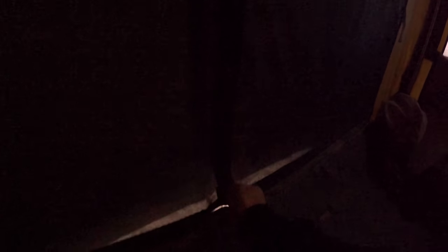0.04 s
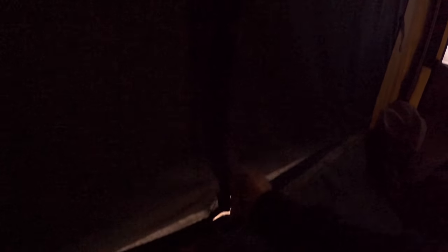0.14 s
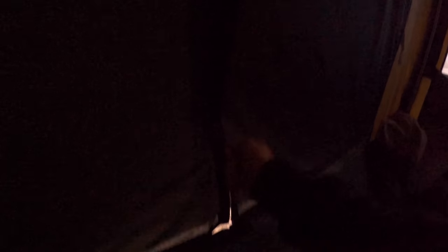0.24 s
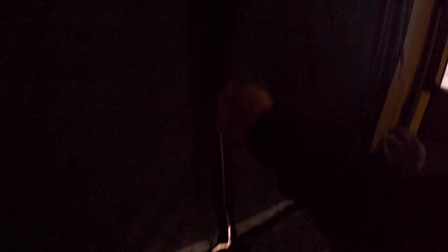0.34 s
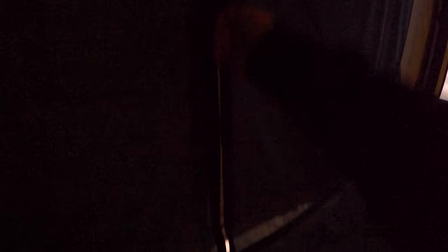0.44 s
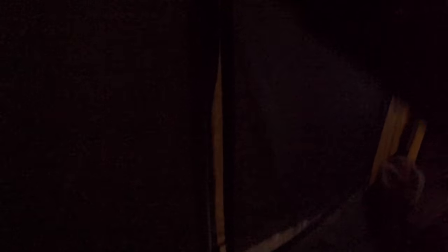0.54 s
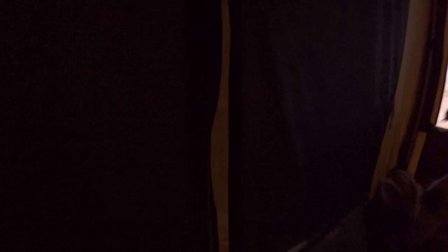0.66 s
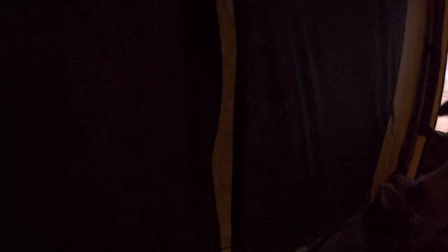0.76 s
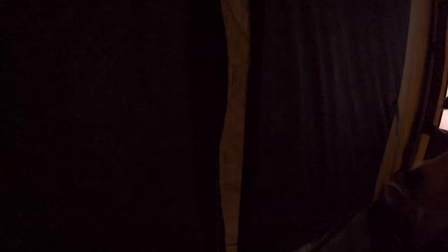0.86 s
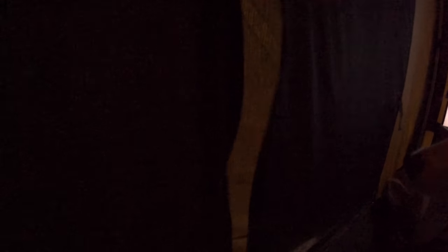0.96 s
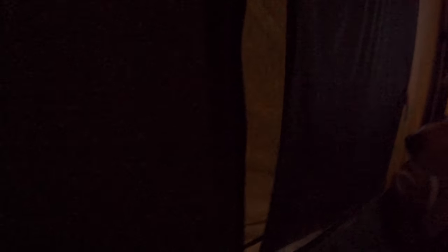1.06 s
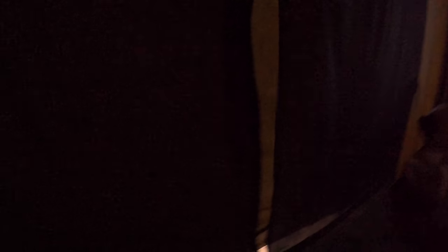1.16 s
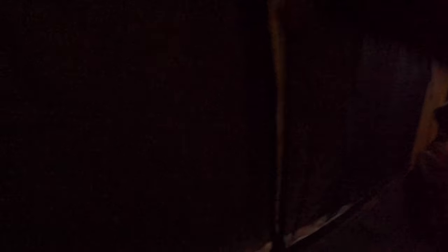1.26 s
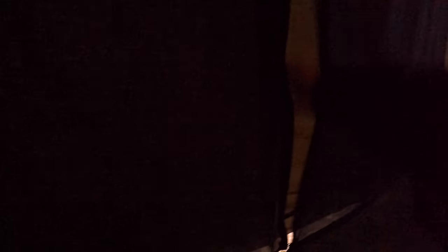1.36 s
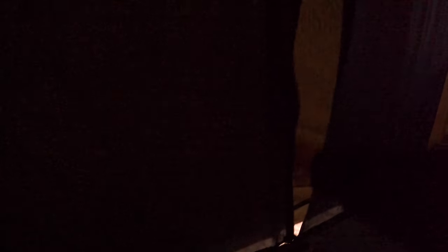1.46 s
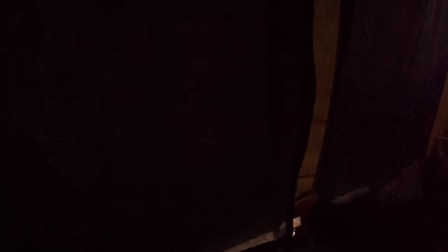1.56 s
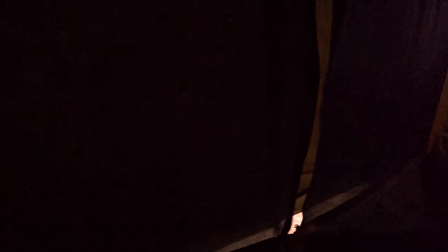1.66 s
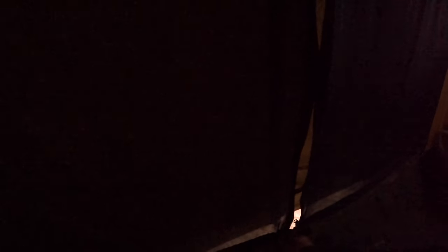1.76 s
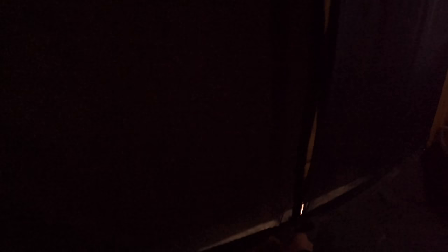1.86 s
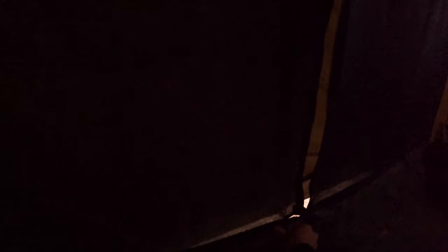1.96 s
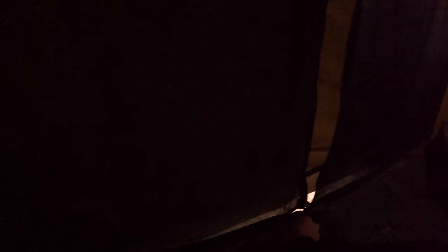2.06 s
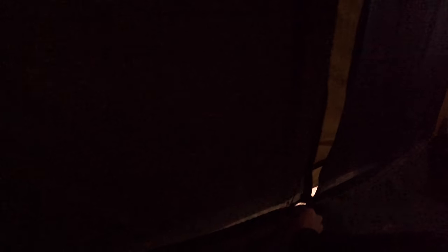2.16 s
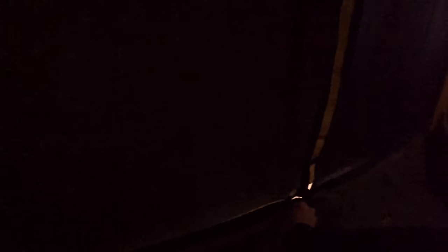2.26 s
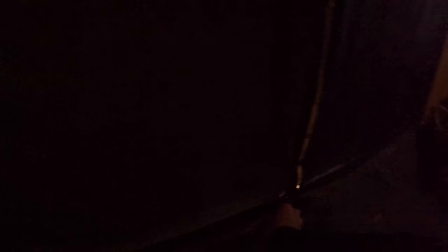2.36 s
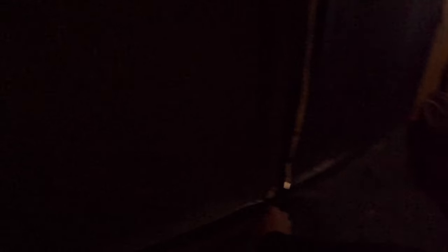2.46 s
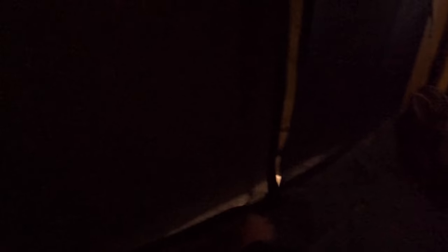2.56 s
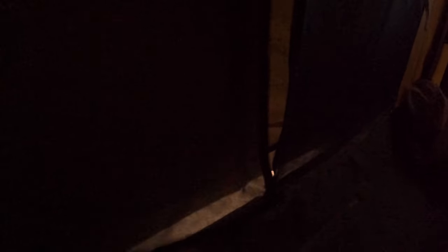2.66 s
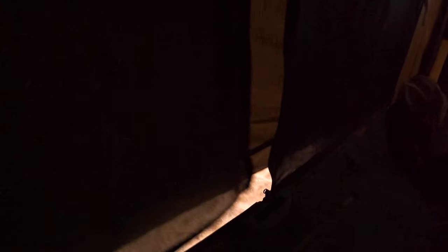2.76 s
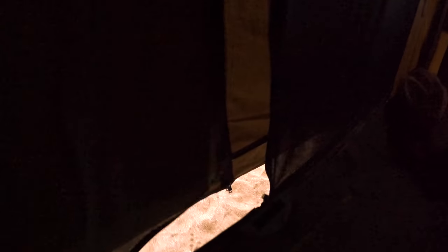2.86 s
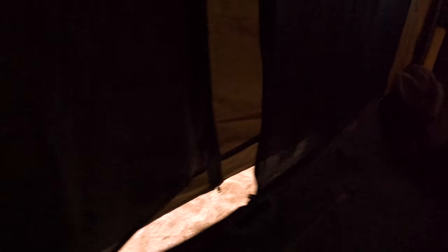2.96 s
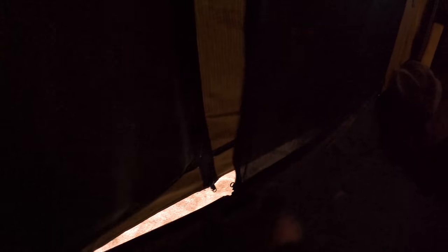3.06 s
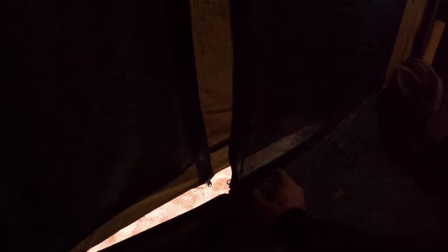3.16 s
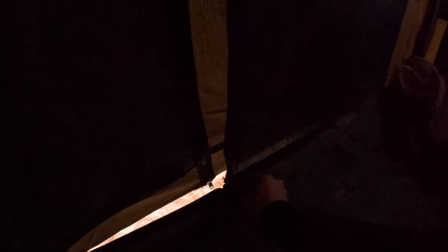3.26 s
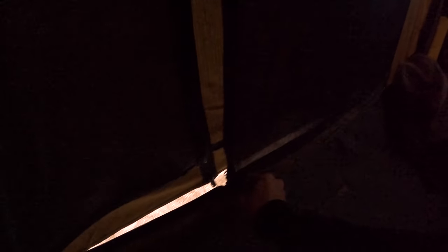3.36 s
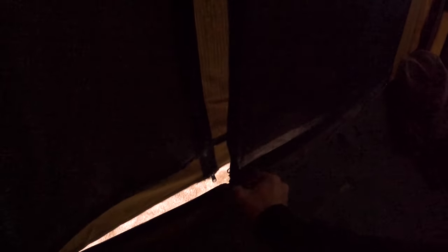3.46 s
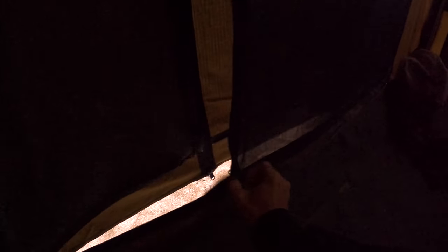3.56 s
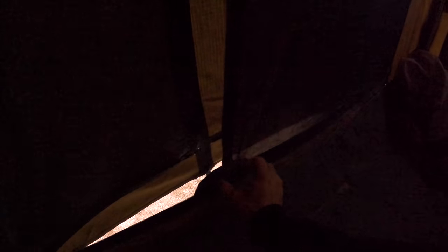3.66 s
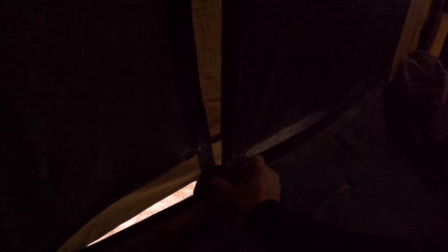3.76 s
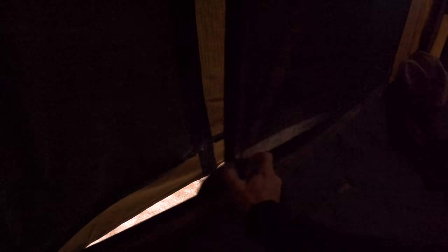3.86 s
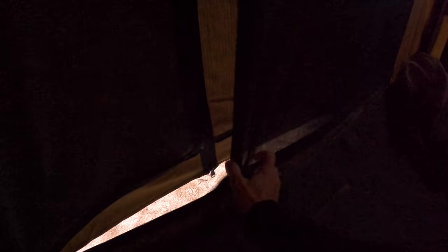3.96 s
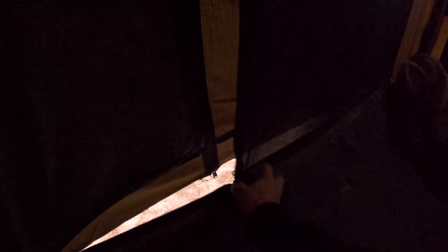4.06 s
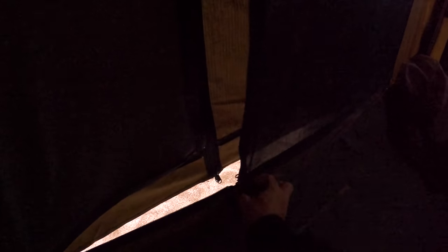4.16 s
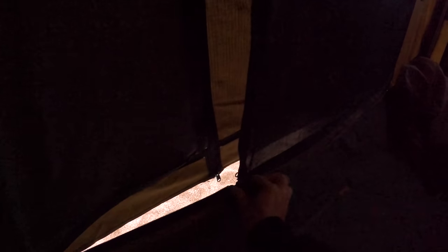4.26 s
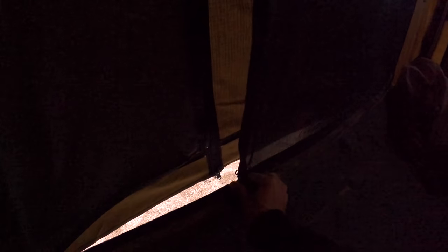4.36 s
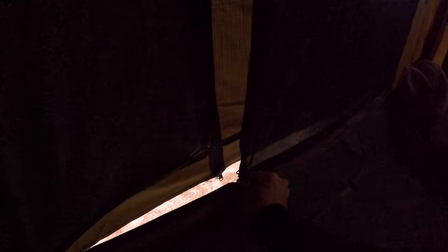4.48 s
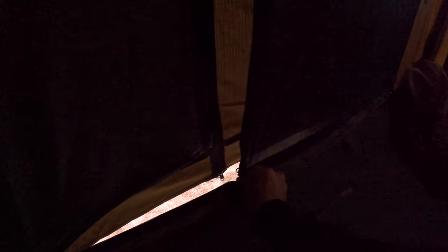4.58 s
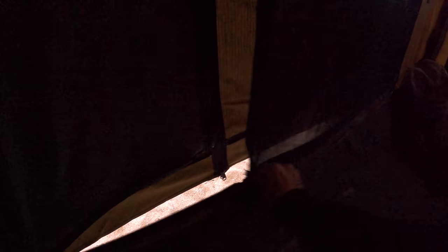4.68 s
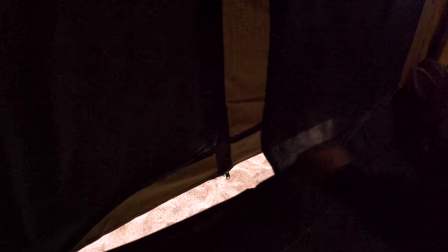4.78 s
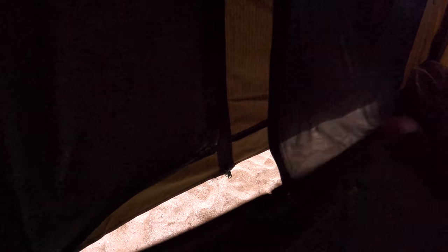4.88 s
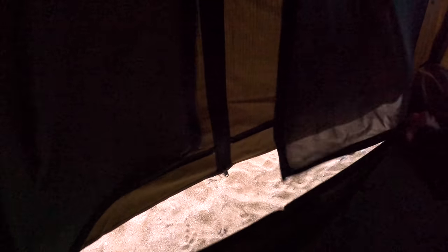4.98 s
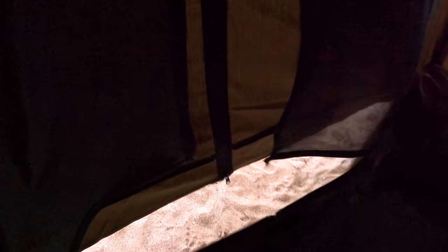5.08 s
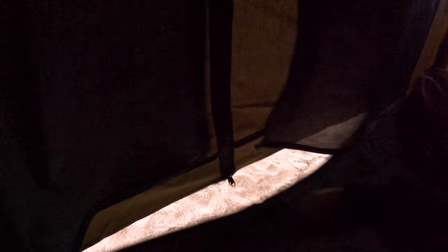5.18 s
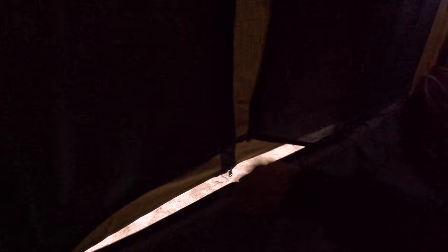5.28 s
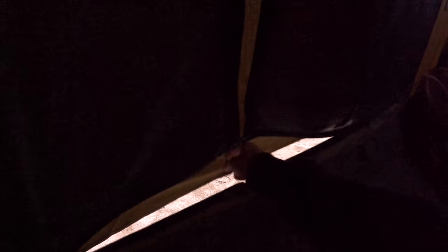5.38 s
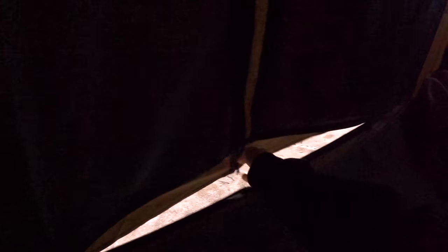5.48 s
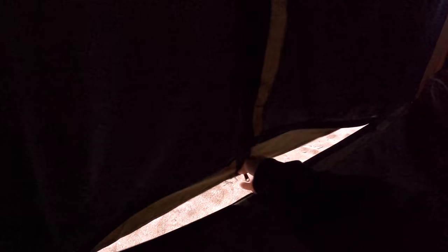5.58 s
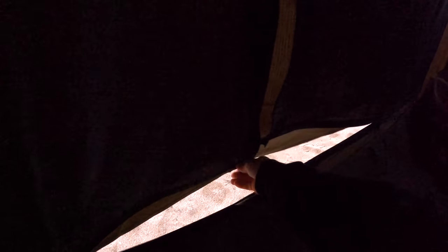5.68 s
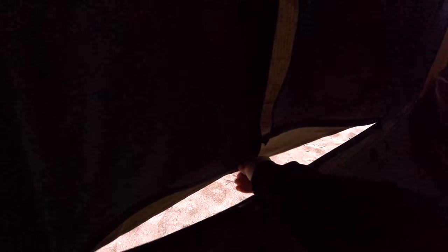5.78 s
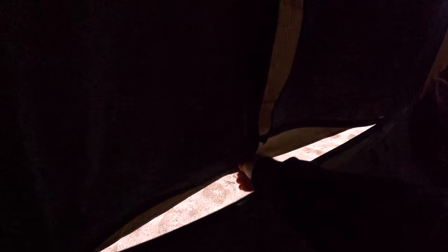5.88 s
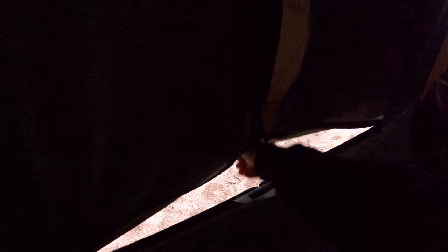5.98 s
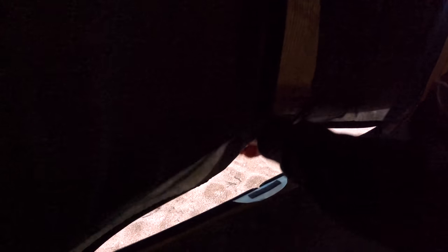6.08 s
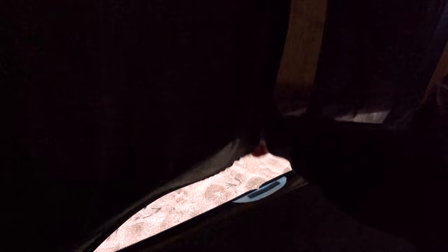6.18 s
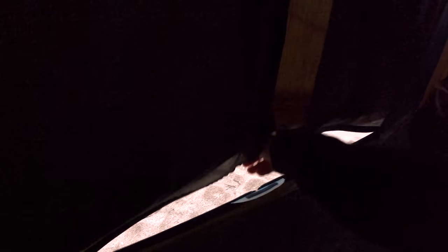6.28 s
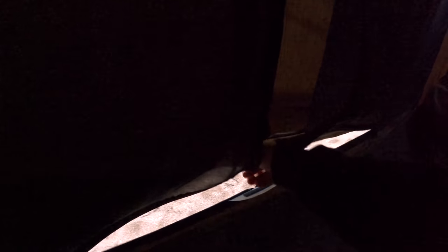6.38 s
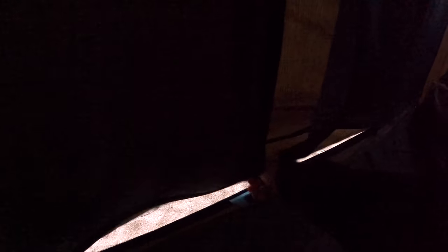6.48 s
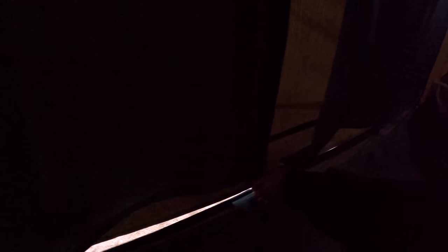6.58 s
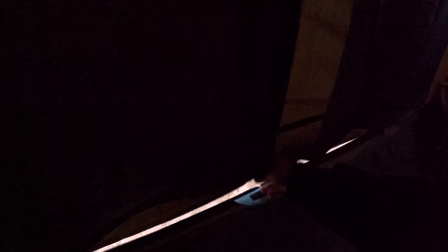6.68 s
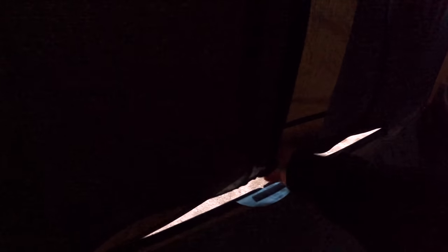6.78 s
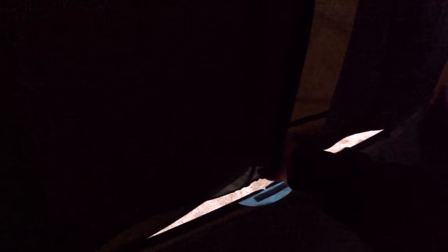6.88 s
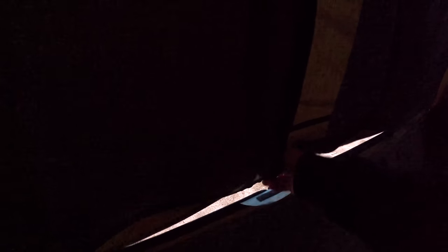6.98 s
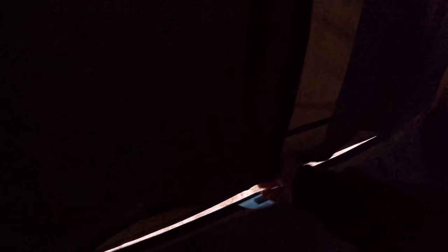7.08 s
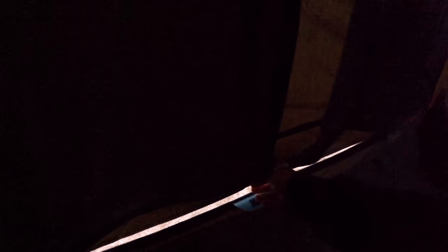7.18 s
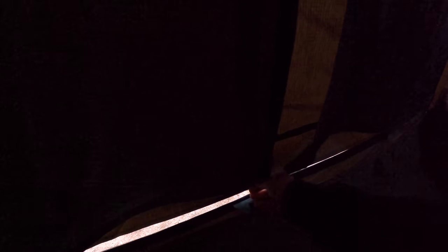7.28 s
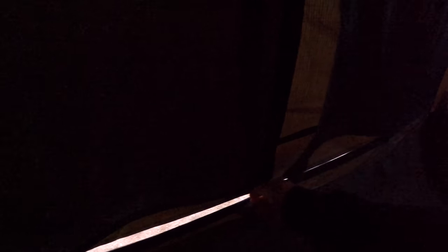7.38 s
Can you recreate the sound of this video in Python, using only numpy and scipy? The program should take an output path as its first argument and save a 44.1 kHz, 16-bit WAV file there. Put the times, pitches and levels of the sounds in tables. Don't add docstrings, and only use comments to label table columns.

```python
import sys
import numpy as np
from scipy import signal
from scipy.fft import rfft, irfft, next_fast_len
from scipy.io import wavfile
from scipy.ndimage import uniform_filter1d

SR = 44100
rng = np.random.default_rng(int(sys.argv[2]) if len(sys.argv) > 2 else 0)


def magnitude_from_level(level_db):
    exponent = np.asarray(level_db, float) / 20
    return 10 ** exponent


def wav_record(signal):
    frames = np.transpose(np.atleast_2d(signal))
    bounded = np.clip(frames, -1, 1)
    quanta = np.round(bounded * 32767).astype(np.int16)
    wavfile.write(sys.argv[1], SR, quanta)


N = 328041
TIME = np.arange(N) / SR
SIZE = next_fast_len(N)
HZ = np.maximum(np.fft.rfftfreq(SIZE, 1 / SR), 10)

# [start_s, teeth_hz (teeth per second), rasp_db, singing_db, edge_db]
SET_OFF = [
    (0.23, 260, -46, -58, -13),
    (0.28, 382.7, -39.5, -48, -11.5),
    (0.315, 458, -39, -41, -11),
    (0.336, 579, -37, -41, -14.5),
    (0.382, 790, -33, -40.5, -18),
    (0.4, 844, -30.5, -40, -15.5),
    (0.428, 864, -29.5, -37, -16),
    (0.445, 965, -31, -38.5, -15.5),
    (0.49, 1005, -32, -37.5, -15.5),
]
RUN = [
    (0.511, 1060, -33.5, -35, -13),
    (0.56, 1030, -31.5, -35, -17),
    (0.632, 1070, -32, -36, -15.5),
    (0.69, 1040, -33.5, -36, -14),
    (0.73, 985, -34, -38.5, -11.5),
    (0.81, 1080, -30, -43, -13),
    (0.86, 1063, -33.5, -35, -8.5),
]
STOP = [
    (0.92, 1096, -38.5, -34.5, -3),
    (0.958, 1049, -41, -29.5, 1),
    (0.976, 957, -37, -36, -4.5),
    (0.992, 772, -34.5, -40.5, -7),
    (1.01, 552, -36.5, -40.5, -8),
    (1.068, 203, -49, -60, 5),
]
SECOND_STROKE = [
    (2.67, 508, -46, -70, -25),
    (2.725, 737.5, -32, -54, -12),
    (2.755, 937, -30.5, -37.5, -4),
    (2.785, 1037, -34, -35, -10.5),
    (2.82, 1208, -38, -31, -5),
    (2.858, 1250, -40, -29.5, -12.5),
    (2.882, 1090, -32, -33, -6),
    (2.9, 897.4, -31, -30, -7),
    (2.925, 686, -32, -53.5, -14),
    (2.97, 438, -58, -67, -16),
]
THIRD_STROKE = [
    (4.85, 416.4, -50, -62, -17),
    (4.9, 631, -33.5, -45, -9),
    (4.938, 931, -31, -36, -15),
    (4.969, 1301, -29, -40.5, -10.5),
    (4.987, 1221, -31, -31.5, -9.5),
    (5.02, 1363, -31, -29, -5),
    (5.045, 1290, -32, -34.5, -11.5),
    (5.065, 992, -28, -29, -2),
    (5.085, 798, -25.5, -42, -12),
    (5.151, 197.5, -46, -67, -15),
]
# [time_s, share of speed, length_s]
LURCHES = [(0.61, -.02, .01), (0.632, .015, .008), (0.702, .025, .007), (0.72, -.025, .01),
           (0.745, .035, .014), (0.786, -.055, .01), (0.812, .07, .013), (0.835, -.055, .008),
           (0.886, -.03, .008), (2.868, .03, .008), (4.972, .03, .008)]
# [time_s, level_db, length_s]
STUMBLES = [(0.397, -4, 0.004), (0.463, -7.5, 0.016), (0.661, -14.5, 0.015), (0.74, -10.5, 0.0067),
            (0.785, -11.5, 0.0074), (0.815, -6, 0.03), (0.775, -8, .004), (4.88, -14, .022),
            (0.876, -8, 0.0053), (0.885, -8, 0.015), (2.835, -3, 0.006), (0.835, -13, 0.0088),
            (0.925, -5, .005), (4.952, -5.5, .005), (2.905, -8, .015), (5.01, -12.5, 0.013),
            (5.09, -6, 0.014)]
# [time_s, level_db, length_s]
FALTERS = [(0.704, -7, 0.018), (0.765, -3, 0.042), (2.775, -20, 0.0094), (2.865, -13, 0.018),
           (2.914, -7, 0.0084), (4.912, -20, 0.012), (4.967, -14, .016), (5.006, -16, 0.007),
           (4.993, 4, .007), (5.082, -10, .008), (0.457, -9, .006), (0.75, -16, 0.01), (0.887, -8, 0.0057)]
PATH_GAPS = {3: [(0.35, 5, .02), (0.515, -5, 0.01), (0.59, 1, .008), (0.66, -7, .015), (0.8, -17, 0.086),
             (0.93, 0, 0.019), (1.0, -13, 0.024), (2.772, -5, 0.006), (2.81, -3, 0.016), (2.89, -4, 0.0079),
             (4.945, -7, .018), (5.047, 8, .006), (5.065, -18, 0.013)], 4: [(0.35, -12, .01),
             (0.41, 10, 0.027), (0.5, -14, 0.055), (0.69, 2, .06), (0.64, 3, .03), (0.81, 5, .012),
             (0.84, -3, .01), (0.878, 5, .012), (0.94, -5, 0.032), (1.0, -12, .02), (2.78, 4, .02),
             (2.822, -7, 0.013), (2.86, 5.5, 0.015), (2.9, -9, 0.015), (4.945, -4, 0.0073),
             (5.065, -2.5, 0.024)], 5: [(0.62, -10, 0.033), (0.78, -6, 0.042), (0.92, 6, 0.033),
             (2.77, 1, .02), (2.85, 2, .025), (5.0, -8, .02), (5.035, 7.5, .015), (4.94, -6, .01),
             (4.965, 3, 0.011), (5.065, 0, .012)], 6: [(0.845, 9, .012), (0.93, 2, .02), (4.955, -3, .01),
             (5.02, 1, 0.019)], 7: [(4.96, 3, .01), (5.03, 8, .015)], 8: [(4.985, -6, .01),
             (5.03, 2, .015)], 9: [(5.02, 8, .02), (2.84, 3, 0.021)]}
COIL_PARTIALS = [
    (0, 0.4, -6, -9.5, -11),
    (0, -4, -3, -1.5, -7.5),
    (0, 0.5, -2.5, -2.5, -12),
]
# [frequency_hz, level_db]
WALL_RADIATION = [(300, -11), (700, 1.5), (950, 2), (1300, 3.5), (2050, 3.5), (3000, 2.5), (4000, 2.5),
                  (5500, 1)]
ROLL_DB = (-3.5, -4, -3.5)
FLOOR_ROLL_DB = (-1.5, -1.5, -1)
BLUR_RAD = (.11, .08, .065)
# [frequency_hz, level_db]
RASP_COLOUR = [(400, -72), (900, 1), (1500, 0), (2200, 3), (3500, 0.5), (6000, -3.5), (8000, -14.5),
               (10800, -25), (11600, -27.5), (15500, -45)]
LONG_COIL = [(3500, -1.5), (4400, 0.5), (6500, 0.5), (7900, -1.5), (10300, 2), (10900, -3), (11500, -3),
             (14000, 2)]
# [time_s, level_db, length_s]
GLINTS = [
    (0.639, 0.5, .03),
    (0.8, -6, 0.022),
    (2.84, 0, .03),
    (2.93, 2, .02),
    (4.89, -5, .03),
    (5.002, 8.5, .025),
    (5.07, 1.5, .03),
    (5.113, 2, .02),
]
SHELF_DB = (-2, 0.5, -2)

# [frequency_hz, level_db, t60_s]
TAB_MODES = [
    (6240, -0.5, 0.071),
    (9980, 2.5, 0.082),
    (11800, 0, .06),
    (14800, 8, 0.13),
]
# [start_s, peak_db, hardness_db of the two top modes]
TINKLES = [(0.1057, -40, -36), (0.119, -47, -31), (0.189, -43, -17.5), (0.247, -27, -36),
           (0.2713, -32, -34), (0.31, -43, -26), (1.0841, -46, -38), (1.1327, -43, -30), (1.1594, -46, -24),
           (1.4683, -36, -24), (1.8194, -63, -8), (1.886, -68, -4), (1.9296, -62, -12), (3.2166, -41, -36),
           (3.2949, -38.5, -33), (3.4082, -46, -30), (3.493, -34, -26), (3.76, -39, -39),
           (4.2712, -40.5, -28), (4.367, -40, -39), (5.2, -44, -24), (5.439, -39, -37), (5.5994, -56, 0.5),
           (5.6336, -50, -22), (5.7683, -48, -42), (6.4832, -47, -30), (6.6034, -56, -28),
           (6.698, -31, -42)]
# [start_s, peak_db]
TWISTS = [
    (0.0175, -53),
    (0.188, -60),
    (0.3094, -58),
    (3.2949, -55),
    (3.4082, -49),
    (4.2712, -58),
    (5.1995, -45),
    (5.439, -49),
    (5.6025, -62),
]
# [time_s, rms_db, centre_hz, width_hz, length_s]
SQUEAKS = [(3.306, -45.5, 3160, 400, 0.016), (3.347, -45, 4200, 400, 0.026), (3.364, -41, 2150, 400, 0.013),
           (3.379, -37, 1890, 400, 0.015), (3.768, -47.5, 2980, 400, 0.018), (4.006, -50, 4830, 500, 0.032),
           (5.353, -43, 7950, 894, 0.0094), (6.151, -50, 4000, 500, 0.027), (0.99, -34.5, 5500, 1504, 0.07),
           (1.395, -62, 11500, 3000, 0.04), (4.003, -62, 10170, 5990, 0.043),
           (5.337, -62, 8920, 8000, 0.028)]
# [start_s, peak_db, centre_hz]
CRACKS = [(1.0363, -28, 5000), (1.0471, -30, 4000), (1.2693, -33, 1200), (4.1911, -30, 2500),
          (4.8891, -28, 2520), (5.0872, -18, 2500), (5.1004, -27, 2524), (5.1042, -30, 2000),
          (5.1084, -28, 2000), (5.1131, -26, 2500), (5.126, -18.5, 2200), (5.1261, -18, 2200),
          (5.1955, -24.5, 1795), (5.2502, -36, 2000), (5.5574, -28, 2200), (5.561, -24, 1500),
          (5.5603, -27, 1800), (5.5714, -26, 3000), (5.58, -21, 2300), (5.5865, -30, 3500),
          (5.6036, -23, 4200), (5.6255, -32, 4000), (5.6407, -36, 3000)]
# [start_s, peak_db, centre_hz]
THUDS = [
    (1.218, -23, 190),
    (1.227, -24, 200),
    (1.2425, -24, 180),
    (1.4385, -19, 230),
    (1.657, -26, 230),
    (3.965, -23.5, 150),
    (6.205, -27, 170.3),
]
# [start_s, peak_db, top_db of the click]
CLOTH_TICKS = [(0.0176, -42.5, -1), (1.126, -54, -10), (1.049, -45, -20), (1.4676, -52, -5),
               (1.725, -37, -31), (1.885, -50, -4), (1.27, -47, -10), (1.927, -40, -33), (2.4696, -38, -26),
               (3.2594, -46.5, -18), (3.297, -31.5, -28), (3.426, -37, -29), (3.598, -37, -33),
               (3.633, -35, -34), (3.6421, -32, -27), (3.7439, -36, -34), (3.8583, -44, -9),
               (4.1905, -27, -39), (4.2712, -46, -24), (4.561, -41, -34), (5.2859, -41, -28),
               (5.5615, -35, -38), (5.584, -39, -32), (5.6404, -41, -28), (5.91, -49, -30),
               (6.486, -37, -22), (6.995, -39, -18)]
# [start_s, peak_db]
THIN_TICKS = [
    (3.3353, -36),
    (5.6026, -31),
    (5.623, -35),
    (5.8681, -52),
]
# [start_s, peak_db]
TAB_TICKS = [
    (0.1194, -41),
    (0.189, -40),
    (0.243, -42),
    (3.2171, -44),
    (3.4915, -45),
    (5.199, -34),
]
# [start_s, peak_db, centre_hz]
SNAPS = [(1.27, -34, 700), (1.433, -47, 970), (5.127, -28, 2450), (5.1262, -23, 1170), (5.196, -30, 1700),
         (5.195, -36, 960), (5.249, -35, 943), (5.25, -35, 2200), (5.551, -29, 1500), (5.5552, -28, 2550),
         (5.559, -29, 1250), (5.5672, -28, 2590), (5.576, -31, 2480)]
# [start_s, peak_db]
SLAPS = [
    (1.218, -26),
    (1.238, -31),
    (1.251, -25),
    (1.431, -21.5),
    (1.653, -31),
    (3.96, -32),
    (4.884, -27),
    (5.084, -25),
    (5.098, -24),
    (6.202, -22),
]
# [start_s, peak_db, centre_hz]
BUMPS = [(0.048, -47, 53.4), (0.096, -28, 70.0), (0.239, -23.5, 69.4), (0.897, -28.5, 30.2),
         (1.024, -30, 43.3), (1.224, -32, 53.8), (1.251, -25.5, 58.5), (1.431, -28, 59.5), (1.62, -18, 43),
         (1.649, -35, 43.1), (1.829, -40, 48.4), (2.328, -28, 74.1), (2.848, -37, 70), (2.969, -33, 32.6),
         (3.718, -37, 24.1), (3.956, -23.5, 45.8), (4.03, -24, 69.6), (4.097, -27, 30.2),
         (4.149, -37, 24.3), (4.889, -26, 69.4), (5.029, -32, 31.9), (5.1, -26, 71.6), (5.15, -27, 51),
         (5.349, -32.5, 39.6), (5.444, -24, 75), (6.2, -37, 51.1), (6.745, -43, 43), (7.088, -30, 56.5),
         (7.329, -30, 32.7)]
# [time_s, level_db, length_s, top_db]
RUBS = [(0.24, -51.5, 0.075, -17), (1.1, -57, 0.62, -15), (1.593, -62.5, 0.97, -26),
        (2.477, -52.5, 0.021, -19), (3.35, -57, 0.11, -15), (4.134, -62.5, 0.31, -15),
        (4.87, -59, 0.065, -22), (5.143, -54, 0.096, -13), (5.275, -59.5, 0.19, -17),
        (5.596, -51, 0.038, -21), (6.182, -57.5, 0.046, -18), (7.0, -68, 0.74, -55)]
# [frequency_hz, level_db]
CLOTH_COLOUR = [(900, 3.5), (2000, 4), (4000, -2.5), (7000, -5.5), (10000, -19), (12500, -30), (13500, -28),
                (15500, -57)]
# [frequency_hz, level_db]
RUMBLE_COLOUR = [(12, -52), (20, -8.5), (70, -5.5), (109, -1), (191, -3), (256, -6), (352, -13),
                 (547, -16.5), (618, -22), (1090, -23), (2690, -28.5), (7000, -44), (9100, -43),
                 (15400, -120)]
# [frequency_hz, level_db]
RUMBLE_TREBLE = [(6500, -1), (8000, -11), (9000, -25), (12000, -24), (13000, -30), (13600, -58)]
# [time_s, level_db]
SWELL = [
    (0.0, -28.5),
    (0.12, -32),
    (0.29, -37.5),
    (3.29, -35.5),
    (3.94, -33.5),
    (5.2, -39),
    (6.15, -34),
    (7.0, -36.5),
    (7.21, -33.5),
    (7.44, -37),
]
# [frequency_hz, likeness_0_to_1]
FAR_LIKENESS = [(25, 0.84), (120, 1), (300, 1), (700, 0.86), (1500, 0.71), (3000, 0.68), (7000, 0.48),
                (15000, 0)]
NEAR_LIKENESS = [(500, 0.99), (1500, 0.93), (3000, 0.67), (7000, 0.81), (15000, 0)]
# [frequency_hz, left_minus_right_db]
SHADOW = [(60, 0), (1500, -.7), (3000, -1.5), (5000, -4.5), (9000, -6.5), (15000, -7)]


def rms_one(x):
    return x / np.sqrt(np.mean(x ** 2) + 1e-20)


def at_hz(points):
    hz, values = np.transpose(points)
    return np.interp(np.log(HZ), np.log(hz), values)


def played(tables, fade_s):
    s, *columns = np.transpose(np.concatenate(tables))
    gate = 0
    for table in tables:
        inside_s = np.minimum(TIME - table[0][0], table[-1][0] - TIME)
        gate = gate + np.clip(inside_s / fade_s, 0, 1)
    return gate, [np.interp(TIME, s, column) for column in columns]


def bell(s, length):
    return np.exp(-((TIME - s) / length) ** 2)


def swells(rows):
    return sum(height * bell(s, length) for s, height, length in rows)


def drift(rate):
    r = np.exp(-16 * np.pi * rate / SR)
    noise = rng.standard_normal(N // 8 + 5002)
    slow = signal.lfilter([1], [1, -2 * r, r * r], noise)[5000:]
    return np.interp(np.arange(N) / 8, np.arange(len(slow)), rms_one(slow))


def filtered(x, order, hz, kind):
    return signal.sosfilt(signal.butter(order, hz, kind, fs=SR, output="sos"), x)


def split(x, top_db, hz):
    return filtered(x, 3, hz, "low") + filtered(x, 3, hz, "high") * magnitude_from_level(top_db)


def add(out, s, sound):
    i = max(round(s * SR), 0)
    out[..., i:i + sound.shape[-1]] += sound[..., :N - i]


def ports(same, other, likeness, lag_us, shade, colour_db=0):
    alike = np.clip(at_hz(likeness), 0, 1)
    mid = np.sqrt(1 + alike) * rfft(same, SIZE)
    side = np.sqrt(1 - alike) * rfft(other, SIZE)
    tilt = magnitude_from_level(shade * at_hz(SHADOW) / 2) * np.exp(-1j * np.pi * HZ * lag_us * 1e-6)
    pair = np.array([(mid + side) * tilt, (mid - side) / tilt]) * magnitude_from_level(colour_db)
    return irfft(pair / np.sqrt(2), SIZE)[:, :N]


def zipper():
    strokes = [SET_OFF + RUN + STOP, SECOND_STROKE, THIRD_STROKE]
    gate, (teeth_hz, rasp_db, singing_db, top_db) = played(strokes, fade_s=0.022)
    stroke = np.searchsorted([STOP[-1][0], SECOND_STROKE[-1][0]], TIME)
    teeth_hz = teeth_hz * (1 + swells(LURCHES))
    stumble_db = swells(STUMBLES)
    edge_db = top_db + 8.5
    unsteady = 0.00846 * (1 - .06 * stumble_db) * np.minimum(1250 / teeth_hz, 1.8) ** 1.5
    wavering = drift(90) + .8 * drift(22)
    turn = 2 * np.pi * np.cumsum(teeth_hz * (1 + unsteady * wavering)) / SR
    tone = singing(stroke, teeth_hz, turn, rasp_db, singing_db, stumble_db, edge_db)
    hiss = rasp(stroke, teeth_hz, turn, edge_db)
    return gate * (tone + hiss * magnitude_from_level(rasp_db - 2.0))


def singing(stroke, teeth_hz, turn, rasp_db, singing_db, stumble_db, edge_db):
    falter_db = swells(FALTERS)
    sheet_hz, sheet_db = np.transpose(WALL_RADIATION)
    orders_db = list(np.transpose(COIL_PARTIALS)[:, stroke])
    fifth_db = orders_db[-1]
    orders_db += [fifth_db + np.take(ROLL_DB, stroke) * k for k in range(1, 7)]
    tone = np.zeros((2, N))
    for k, order_db in enumerate(orders_db, 1):
        upper = k > 2
        per_edge = {1: 0, 2: -1.46}.get(k, 0.095)
        db = order_db + singing_db + per_edge * edge_db
        db = db + stumble_db * (1 if k == 2 else 0.38) + falter_db * (k == 1)
        db = db + upper * -4 * np.log2(teeth_hz / 1150)
        db = db + np.interp(np.log(k * teeth_hz), np.log(sheet_hz), sheet_db)
        db = db + swells(PATH_GAPS.get(k, []))
        least_db = rasp_db - 20 + np.take(FLOOR_ROLL_DB, stroke) * max(k - 5, 0)
        least = upper * magnitude_from_level(least_db) * (teeth_hz / 1250) ** 2
        height = np.sqrt(2) * np.hypot(magnitude_from_level(db), least)
        flutter_db = .6 + .7 * (min(k, 4) if upper else 1)
        chatter_db = 2.3 if upper else 1
        height = height * magnitude_from_level(flutter_db * drift(25))
        height = height * (1 + .26 * drift(300)) * magnitude_from_level(chatter_db * drift(70))
        phase = k * turn + .9 * k * k + np.take(BLUR_RAD, stroke) * k ** 1.5 * drift(110)
        tone[0] += height * np.cos(phase)
        tone[1] += height * np.sin(phase + 0.29 * drift(120))
    return ports(*tone, NEAR_LIKENESS, lag_us=7.8, shade=0.38)


def rasp(stroke, teeth_hz, turn, edge_db):
    depth = np.minimum(0.27 * (1250 / teeth_hz) ** 0.89, .95)
    pulses = 1 + depth * np.cos(turn)
    grit = magnitude_from_level(0.57 * drift(160) + 0.45 * drift(35)) * pulses * rng.standard_normal((2, N))
    colour_db = at_hz(RASP_COLOUR)
    short = ports(*grit, NEAR_LIKENESS, lag_us=41.0, shade=0.89, colour_db=colour_db)
    long = ports(*grit, NEAR_LIKENESS, lag_us=41.0, shade=0.89, colour_db=colour_db + at_hz(LONG_COIL))
    noise = rms_one(np.where(stroke == 0, long, short))
    noise = split(noise, swells(GLINTS), hz=6700)
    hump = filtered(noise, 2, [9000, 10900], "band")
    far_end = np.clip((TIME - .68) / .06, 0, 1) * (stroke == 0)
    noise = noise + hump * (magnitude_from_level(2.5) - 1) * far_end
    rattle = rms_one(signal.lfilter(*signal.iirpeak(TAB_MODES[0][0], 60, fs=SR), noise))
    noise = split(noise, 1.0 * drift(4.5), hz=4000)
    lagging_edge_db = uniform_filter1d(edge_db, round(.12 * SR))
    db_per_octave = np.take((1.5, 13, 3.5), stroke)
    hiss_db = 0.8 * lagging_edge_db + db_per_octave * np.log2(teeth_hz / 1100) + 16.5 + 0.48 * drift(7.2)
    noise = split(noise, hiss_db, hz=8270)
    noise = split(noise, np.take(SHELF_DB, stroke) + .6 * drift(2.1), hz=11500)
    return noise + magnitude_from_level(-28 + 2.7 * drift(10)) * rattle


def tab():
    out, t = np.zeros((2, N)), np.arange(round(.15 * SR)) / SR
    knocks = [(s, db, db - 28, db + hard_db - 4, db + hard_db) for s, db, hard_db in TINKLES]
    knocks += [(s, -np.inf, db, -np.inf, -np.inf) for s, db in TWISTS]
    for s, *levels in knocks:
        phase = rng.uniform(0, 2 * np.pi, (2, 4, 1))
        twin = 1 + .018 * rng.uniform(-0.87, 1, 4)
        for k, (hz, mode_db, t60) in enumerate(TAB_MODES):
            decay = magnitude_from_level(levels[k] + mode_db - 60 * t / t60)
            first = np.sin(2 * np.pi * hz * t + phase[:, k])
            second = np.sin(2 * np.pi * hz * twin[k] * t)
            add(out, s, 0.6 * decay * (first + second))
    return out


def squeaks():
    out, t = np.zeros((2, N)), np.arange(-2000, 2000) / SR
    for s, db, hz, width_hz, length in SQUEAKS:
        edges = [hz - width_hz / 2, hz + width_hz / 2]
        narrow = filtered(rng.standard_normal((2, 4000)), 2, edges, "band")
        add(out, s + t[0], magnitude_from_level(db) * rms_one(narrow) * np.exp(-(2 * t / length) ** 2))
    return out


def cracks():
    out, click = np.zeros((2, N)), np.eye(1, 2000)[0]
    for s, peak_db, hz in CRACKS + THUDS:
        peak = signal.iirpeak(hz, 1.1, fs=SR)
        ring = signal.lfilter(*peak, signal.lfilter(*peak, click))
        add(out[0], s, -magnitude_from_level(peak_db) * ring / np.abs(ring).max())
    return out


def ticks(table, sharpness, t60):
    out, t = np.zeros((2, N)), np.arange(round(0.069 * SR)) / SR
    for s, peak_db, hz, top_db in table:
        puff = rng.standard_normal((2, len(t))) * magnitude_from_level(-60 * t / t60)
        body = filtered(puff, 2, hz * np.exp(np.array([-1, 1]) / sharpness), "band")
        crack = filtered(puff, 2, [5500, 11500], "band")
        body = body / np.abs(body).max()
        crack = crack / np.abs(crack).max()
        add(out, s, magnitude_from_level(peak_db + 3.0) * (body + magnitude_from_level(top_db + 6.5) * crack))
    return out


def light_ticks():
    light = [(s, db, 2380, top_db) for s, db, top_db in CLOTH_TICKS]
    light += [(s, db, 3700, -19) for s, db in THIN_TICKS]
    light += [(s, db, TAB_MODES[0][0], -28) for s, db in TAB_TICKS]
    return ticks(light, sharpness=2.4, t60=0.019)


def wall_snaps():
    snaps = [(s, db, hz, -np.inf) for s, db, hz in SNAPS]
    return ticks(snaps, sharpness=3.6, t60=0.011)


def wall_slaps():
    slaps = [(s, db, 223, -np.inf) for s, db in SLAPS]
    return filtered(ticks(slaps, sharpness=1.85, t60=0.056), 2, 377, "low")


def bumps():
    out, t = np.zeros((2, N)), np.arange(round(.2 * SR)) / SR
    for s, peak_db, hz in BUMPS:
        swell = np.exp(-((t * hz - .5) / .9) ** 2)
        push = np.sin(2 * np.pi * hz * t) * swell * magnitude_from_level(peak_db - 2.0)
        add(out, s, push * magnitude_from_level(rng.normal(0, 1.5) * np.array([[1], [-1]])))
    return out


def rustle():
    rubs = [(magnitude_from_level(db) * bell(s, length), rub_top_db) for s, db, length, rub_top_db in RUBS]
    rubs += [(magnitude_from_level(-61), -16.5)]
    power = sum(height ** 2 for height, _ in rubs)
    top_db = sum(height ** 2 * db for height, db in rubs) / power
    grains_per_s = 5000 * magnitude_from_level(3 * drift(15))
    born = rng.random((2, N)) < grains_per_s / SR
    strength = magnitude_from_level(0.5 * np.minimum(rng.exponential(1, (2, N)), 4))
    grains = born * strength * rng.standard_normal((2, N))
    cloth = ports(*grains, NEAR_LIKENESS, lag_us=44.0, shade=0.58, colour_db=at_hz(CLOTH_COLOUR))
    return np.sqrt(power) * magnitude_from_level(9.0) * split(rms_one(cloth), top_db + 19.5, hz=8000)


def outside():
    s, swell_db = np.transpose(SWELL)
    colour_db = at_hz(RUMBLE_COLOUR[:-1]) + at_hz(RUMBLE_TREBLE)
    noise = rng.standard_normal((2, N))
    far = ports(*noise, FAR_LIKENESS, lag_us=90.0, shade=0.04, colour_db=colour_db)
    swell = .5 * (np.interp(TIME, s, swell_db) - swell_db.mean()) + 0.83 * drift(1.9)
    return rms_one(far) * magnitude_from_level(-33 - 0.34 + swell)


def scene():
    small = tab() + squeaks() + cracks() + light_ticks() + wall_snaps() + wall_slaps()
    near = ports(*small, NEAR_LIKENESS, lag_us=37.6, shade=1.0)
    return zipper() + near + bumps() + rustle() + outside()


def low_pass(x):
    return signal.sosfilt(signal.butter(12, 15700, fs=SR, output="sos"), x)


def record(dry):
    cut = signal.sosfilt(signal.cheby2(12, 50, 16200, fs=SR, output="sos"), dry)
    return low_pass(cut)


dry = scene()
out = record(dry)
wav_record(out)
```